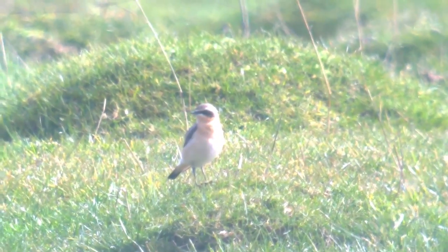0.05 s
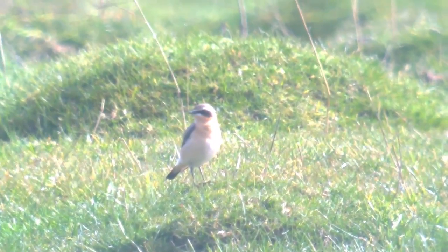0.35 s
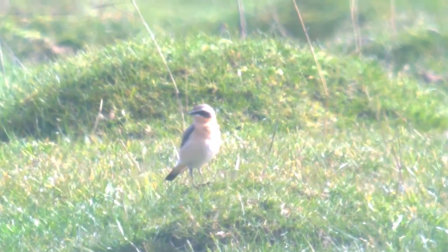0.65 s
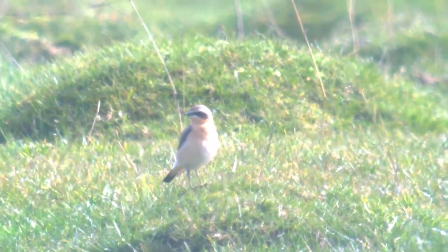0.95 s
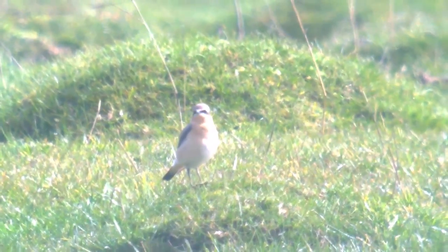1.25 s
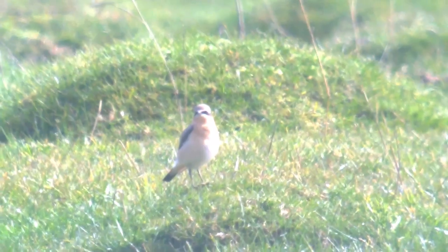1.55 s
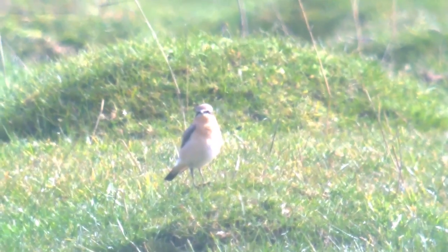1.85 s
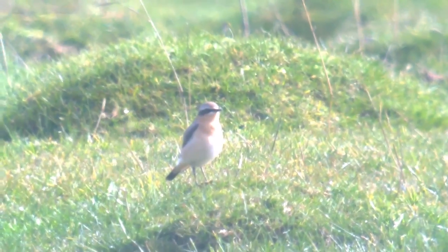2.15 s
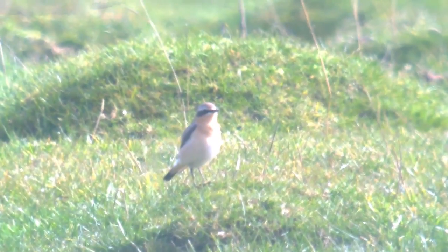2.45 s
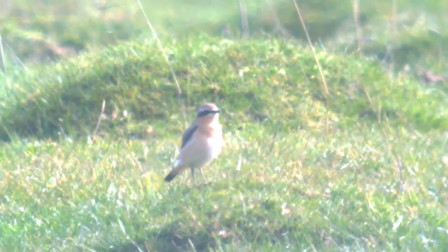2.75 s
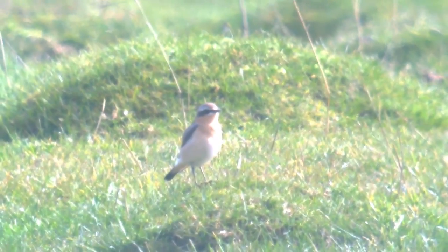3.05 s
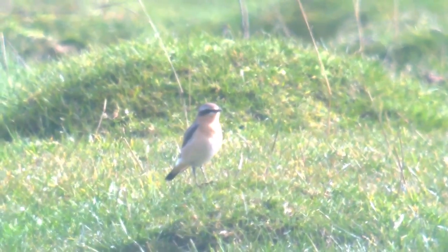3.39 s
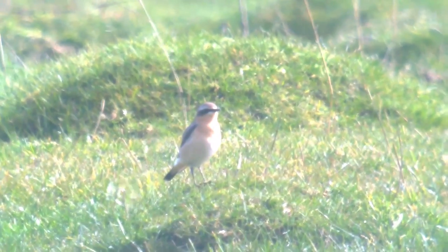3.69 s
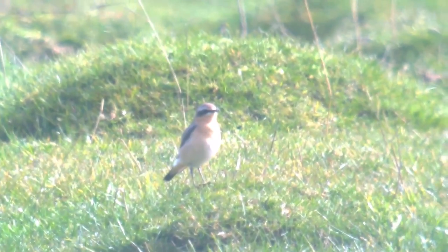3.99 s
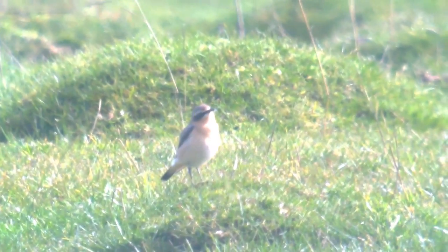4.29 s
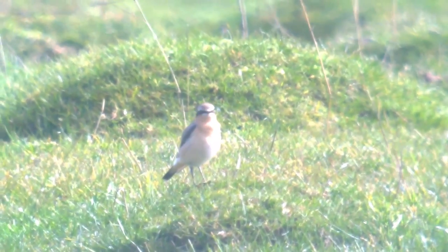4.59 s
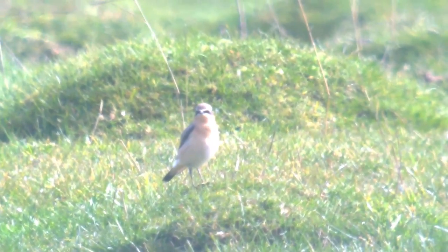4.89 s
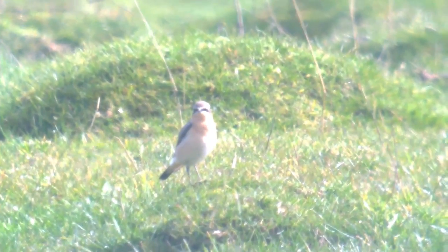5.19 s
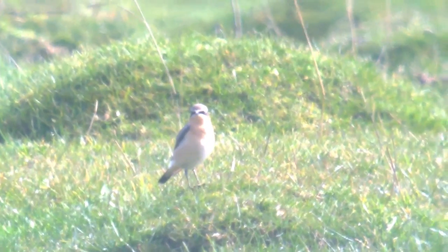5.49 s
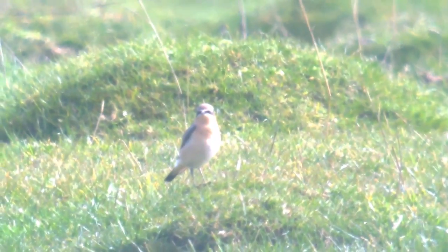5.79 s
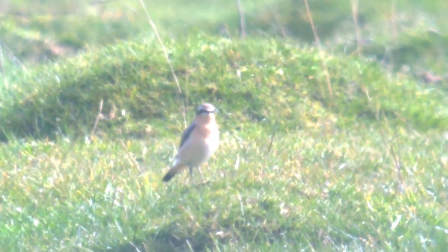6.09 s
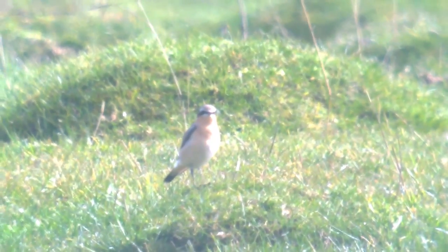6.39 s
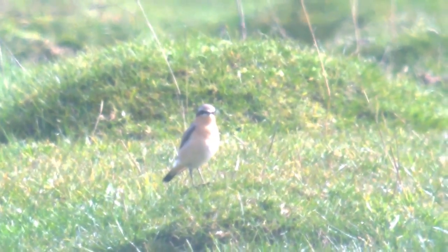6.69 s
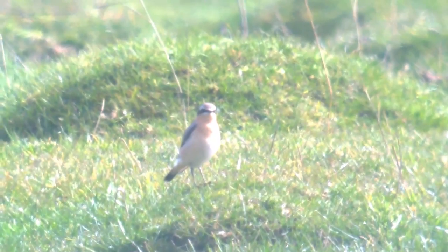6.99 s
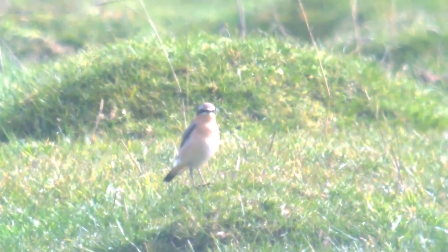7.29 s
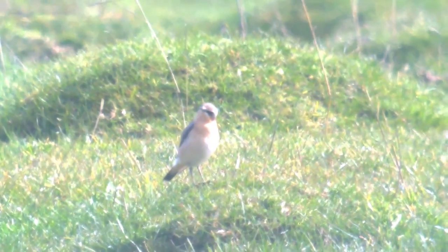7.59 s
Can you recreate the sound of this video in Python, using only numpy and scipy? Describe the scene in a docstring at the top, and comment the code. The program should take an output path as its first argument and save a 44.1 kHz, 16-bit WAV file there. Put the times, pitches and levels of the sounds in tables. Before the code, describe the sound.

Small birds chirp and trill faintly far across a field, under gusty wind, soft microphone bumps and distant echoing knocks.

```python
"""Breezy grassland with far birds

Gusts rumble and flutter on the port of one hand-held microphone, over the rush of the field and a
thin hiss. Small birds whistle, chirp, trill and buzz far off, their song wavering in the moving air.
The microphone takes low thumps and soft bumps; sharp, distant knocks echo. It all sits hard right."""
import sys
import numpy as np
from scipy import signal
from scipy.fft import rfft, irfft, next_fast_len
from scipy.io import wavfile
from scipy.ndimage import uniform_filter1d, map_coordinates

SR = 44100
rng = np.random.default_rng(int(sys.argv[2]) if len(sys.argv) > 2 else 0)


def materialize(psi):
    """Save the field psi as 16-bit PCM at rate SR to the path in sys.argv[1].

    A 1-D psi becomes a single channel; in a 2-D psi each row is a channel.
    """
    bounded = np.clip(np.atleast_2d(psi).T, -1, 1)
    quanta = np.round(bounded * 32767).astype(np.int16)
    wavfile.write(sys.argv[1], SR, quanta)


N = 337365
TIME = np.arange(N) / SR
MEAN_GUST_DB = -43

# Colours of the wind layers and the knocks' echo. Each row: frequency in Hz, relative level in dB.
HISS_COLOUR = [(900, 5.5), (1800, 0.5), (2400, 4), (2650, 2.5), (2880, 4), (3120, -2), (4200, -2.5),
               (5200, -1), (6200, -4.5), (7500, -9.5), (9700, -13), (10600, -7), (12300, -17.5)]
BREEZE_COLOUR = [(100, -1.5), (250, 4.5), (430, 0), (700, -4), (1050, -8.5), (1300, -18), (1700, -25),
                 (3000, -41.5)]
RUMBLE_COLOUR = [(12, -13.5), (24, -2), (38, 1.5), (55, -4), (75, -7.5), (100, -23.5), (150, -34.5),
                 (300, -62)]
FLUTTER_COLOUR = [(50, -22.5), (90, 5), (130, -2), (190, -10), (280, -19), (400, -24.5), (700, -51),
                  (1200, -74.5), (4000, -120)]
ECHO_COLOUR = [(200, -9.5), (400, 16), (560, 8), (800, -0.5), (1150, 3), (1500, -15), (1900, -22),
               (3000, -33.5), (5000, -58.5)]
# The slow lull and rise of the breeze. Each row: time in seconds, level offset in dB.
BREEZE_SWELL = [(0, -1.5), (.75, -1), (1.05, 0), (5.2, 1.5), (7.65, 0)]
# Wind strength on the port. Each row: time in seconds, level in dB.
GUST_CURVE = [(0.0, -43.5), (0.46, -49), (0.61, -33.5), (0.78, -39), (1.08, -37.5), (1.25, -42),
              (1.92, -39), (2.15, -45), (2.27, -47.5), (2.62, -43), (3.1, -47.5), (3.38, -48.5),
              (3.52, -40), (3.65, -46.5), (3.76, -40.5), (3.92, -45.5), (4.2, -39), (4.52, -48),
              (4.7, -38.5), (4.86, -41), (5.28, -38), (5.66, -45), (5.85, -37.5), (6.3, -44.5),
              (7.0, -44.5), (7.65, -47.5)]

# Long falling whistles. Each row: start and length in seconds, then level, swell and halfway dip in dB.
FALLING_WHISTLES = [(0.071, 0.21, -72.5, 2, 0), (1.679, 0.21, -71, -1.5, 8), (2.65, 0.22, -62.5, 10, -1),
                    (4.148, 0.196, -77.5, -10, 8)]
# The envelope they share. Each row: fraction of the length, level offset in dB.
WHISTLE_ENVELOPE = [(0, -11), (.4, -12.5), (.62, -4.5), (.8, -1), (.95, -5), (1, -7.5)]
# Thin high calls. Each row: start and length in seconds, first, top and last pitch in Hz,
# level and swell in dB.
THIN_CALLS = [(.398, .11, 5800, 7440, 6980, -82, -7), (2.982, .11, 6400, 6600, 5000, -90.5, 4),
              (3.128, .07, 6900, 7500, 6850, -90, 16), (3.77, .12, 8300, 8600, 8250, -99, 3),
              (4.88, 0.097, 7000, 7650, 6600, -97, 11), (5.94, .11, 6900, 7900, 7280, -88, 1),
              (6.192, .097, 7040, 7930, 7400, -96, -4), (6.46, .09, 7000, 8100, 7500, -98, 0)]
# Short held notes. Each row: start and length in seconds, pitch and glide in Hz, level in dB.
HELD_NOTES = [(.378, .023, 5740, 60, -74.5), (.756, 0.037, 4620, -300, -84),
              (0.989, 0.042, 4080, -60, -80.5), (1.065, .014, 3920, 2, -81),
              (3.807, 0.035, 4800, 700, -81.5), (4.19, 0.054, 6760, 100, -83),
              (4.305, .025, 5320, 160, -78), (4.676, 0.042, 4370, -60, -73),
              (5.299, 0.09, 4780, -420, -77.5), (5.462, .022, 3640, 150, -76),
              (5.656, 0.027, 3640, 0, -79.5), (5.808, 0.084, 4530, -100, -80.5),
              (6.052, .01, 4360, 400, -78), (6.072, .02, 3700, -70, -80), (6.59, .022, 4430, -350, -84),
              (6.885, .046, 4300, -150, -79), (7.205, .017, 5100, 280, -83),
              (7.568, 0.084, 4700, -450, -85)]
# Downward chirps. Each row: start and length in seconds, first and last pitch in Hz, level in dB.
DOWN_CHIRPS = [(.92, 0.044, 5500, 4800, -85), (.936, .0093, 4150, 3520, -77),
               (1.933, .026, 3500, 2450, -85), (2.017, .03, 3400, 2280, -85.5),
               (2.112, 0.041, 3440, 2190, -86), (2.913, 0.04, 3620, 2330, -80.5),
               (3.0, 0.0294, 3580, 2700, -84), (3.295, .02, 6050, 4750, -82), (3.37, .042, 4650, 4050, -87),
               (3.448, .02, 6100, 5100, -87), (4.482, .006, 5860, 2700, -70.5),
               (5.436, .022, 5400, 4150, -80), (5.86, .036, 6250, 5000, -84.5),
               (6.109, 0.057, 6400, 4750, -89), (6.377, .03, 6200, 5450, -86)]
# Rippling trills and dry rattles. Each row: start and length in seconds, level and swell in dB.
RIPPLE_TRILLS = [(.497, 0.37, -81.5, -9.5), (2.199, 0.29, -83.5, -9), (3.071, .2, -85.5, -3)]
RATTLE_TRILLS = [(1.2055, .39, -79.5, -10), (3.6035, .45, -80.5, -8)]
# Runs of single rising pips. Each row: start and length in seconds, first pitch, last pitch and
# pip sweep in Hz, pip length in seconds, level and swell in dB.
PIP_TRILLS = [(5.105, 0.13, 4330, 4360, 780, 0.0044, -75, 0), (6.962, 0.25, 3120, 2780, 250, .013, -84, -7),
              (7.373, .125, 4370, 4230, 700, 0.0045, -80, 2)]
# Soft warbles and one hard buzz. Each row: start and length in seconds, beats per second,
# pitch, glide and vibrato swing in Hz, level in dB.
SOFT_WARBLES = [(.228, .12, 60, 4600, 200, 130, -86), (2.555, .15, 79, 5100, -3, 80, -83),
                (2.895, 0.083, 85, 5040, -3, 60, -85), (3.298, .07, 66, 4400, -150, 80, -86),
                (3.918, 0.076, 58, 5220, 50, 130, -78.5), (4.54, 0.092, 62, 5130, -100, 190, -77.5),
                (4.895, .095, 52, 5180, 0, 140, -86), (5.255, .057, 54, 5340, 0, 160, -83),
                (5.72, 0.1, 60, 6300, 601, 100, -86), (5.948, 0.054, 80, 5450, 200, 250, -80.5),
                (6.382, .085, 52, 5160, 0, 160, -79), (6.66, 0.2, 49, 5150, -350, 220, -78.5),
                (6.995, .105, 57, 5060, 0, 140, -81)]
HARD_BUZZ = [(6.128, 0.45, 140, 4340, 0, 75, -68.5)]

# Distant knocks. Each row: start in seconds, crack level in dB, pitch ratio, echo level in dB.
FAR_KNOCKS = [(.992, -26.5, 1.06, -45), (1.529, -53.5, 1.12, -59.5), (2.704, -55, 1.2, -55.5),
              (4.175, -39.5, .83, -54.5), (5.144, -77, 1.25, -59), (5.753, -27, 1.014, -46.5),
              (6.566, -52.5, 0.81, -60.5)]
# A knock's hollow ring. Each row: frequency in Hz at pitch ratio 1, level in dB, seconds to fall 60 dB.
KNOCK_RING = [(445, -11.5, 0.09), (494.3, 8.5, 0.027), (751, -15.5, 0.056), (937, -19, 0.045),
              (1190, -17.5, 0.027), (1300, -20.5, 0.048)]
# Low thumps on the microphone, from handling or wind buffets, some with a click.
# Each row: start in seconds, thud in dB, thud pitch in Hz, click in dB.
LOW_THUMPS = [(0.012, -41, 166, -57), (0.209, -32.5, 60, -75), (.58, -44, 142, -43.5),
              (.589, -32.5, 142, -41.5), (0.684, -28, 167, -36), (.692, -26.5, 132, -26),
              (.865, -25.5, 108, -32), (1.896, -34.5, 130, -47.5), (2.126, -28, 59, -68),
              (3.745, -34.5, 85, -51), (4.165, -26.5, 50, -69), (5.83, -34.5, 95, -60)]
# Soft bumps on the housing. Each row: start in seconds, level in dB, pitch in Hz.
SOFT_BUMPS = [(1.136, -42, 293), (1.165, -46, 340), (1.35, -42, 290), (1.449, -53.5, 268),
              (2.569, -37.5, 286), (5.054, -52, 358), (5.17, -47, 337), (5.24, -49.5, 226),
              (6.362, -37, 277), (6.607, -52, 342)]


def from_db(db):
    """Decibels to gain."""
    return 10 ** (np.asarray(db) / 20)


def unit_rms(x):
    """Scale to an rms of 1."""
    return x / np.sqrt(np.mean(x ** 2) + 1e-20)


def automation(curve):
    """A breakpoint curve's value at every sample."""
    return np.interp(TIME, *np.transpose(curve))


def progress(length_s):
    """A ramp from 0 to 1 over a sound's length."""
    return np.linspace(0, 1, max(int(length_s * SR), 8))


def add(out, start, sound):
    """Mix a sound in at a start time in seconds."""
    at = max(round(start * SR), 0)
    out[at:at + len(sound)] += sound[:max(N - at, 0)]


def noise(colour):
    """Coloured noise at unit rms, rolled off outside its range."""
    size = next_fast_len(N)
    hz = np.maximum(np.fft.rfftfreq(size, 1 / SR), 1)
    points_hz, db = np.transpose(colour)
    skirts = 1 / np.hypot(1, (points_hz[0] / hz / 2) ** 2) / np.hypot(1, (hz / points_hz[-1] / 2) ** 2)
    gain = from_db(np.interp(np.log(hz), np.log(points_hz), db)) * skirts
    return unit_rms(irfft(rfft(rng.standard_normal(size)) * gain, size)[:N])


def drift(rate_hz):
    """A smooth random modulator at unit rms, mostly slower than the given rate."""
    size = next_fast_len(N)
    hz = np.fft.rfftfreq(size, 1 / SR)
    return unit_rms(irfft(rfft(rng.standard_normal(size)) / (1 + (hz / rate_hz) ** 2), size)[:N])


def levelled(x, span_s):
    """Ride a noise to about unit level, leaving its quick lumps in."""
    return x / np.sqrt(uniform_filter1d(x ** 2, max(int(span_s * SR), 2)) + 1e-6)


def field_breeze(rush_db=-68.5, gust_follow=0.14, hiss_db=-83.5):
    """The bed: air rushing over the field, leaning a little with the gusts, and a steady thin hiss."""
    gust_lift_db = gust_follow * (automation(GUST_CURVE) - MEAN_GUST_DB)
    rush = from_db(rush_db + gust_lift_db + automation(BREEZE_SWELL)) * noise(BREEZE_COLOUR)
    return rush + from_db(hiss_db) * noise(HISS_COLOUR)


def whistle(hz, db, edge_s=0.0015):
    """A bird's voice: a pure tone riding a pitch and level curve, with soft ends."""
    fades = signal.windows.tukey(len(hz), min(2 * edge_s * SR / len(hz), 1))
    return np.sin(2 * np.pi * np.cumsum(hz) / SR) * from_db(db) * fades


def far_chatter(db=-94, centre_hz=5150, spread_hz=560, glide_hz=400, swing_hz=170, beats_per_s=55):
    """The farthest birds blur into a faint random twitter."""
    out, count = np.zeros(N), 150
    timings, voices = rng.random((count, 2)), rng.standard_normal((count, 3))
    for (when, size), (pitch, glide, accent_db) in zip(timings, voices):
        u = progress(0.013 + 0.081 * size)
        vibrato = swing_hz * np.sin(2 * np.pi * beats_per_s * TIME[:len(u)])
        hz = centre_hz + spread_hz * pitch + glide_hz * glide * (u - .5) + vibrato
        add(out, when * N / SR, whistle(hz, db + accent_db))
    return out


def thin_calls(leap_s=0.022, sag_power=1.8):
    """High calls that leap up, then sag ever faster."""
    out = np.zeros(N)
    for start, length_s, first_hz, top_hz, last_hz, db, swell_db in THIN_CALLS:
        u = progress(length_s)
        leap_hz = np.interp(u * length_s, [0, leap_s], [first_hz, top_hz])
        sag = np.maximum((u * length_s - leap_s) / (length_s - leap_s), 0) ** sag_power
        add(out, start, whistle(leap_hz + (last_hz - top_hz) * sag, db + swell_db * (u - .5)))
    return out


def held_notes(arch_hz=70, swell_db=4, flick_hz=170, flick_s=.005):
    """Short notes that arch in pitch and flick down as the bird lets go."""
    out = np.zeros(N)
    for start, length_s, hz, glide_hz, db in HELD_NOTES:
        u = progress(length_s)
        droop_hz = arch_hz * (2 * u - 1) ** 2 + flick_hz * np.exp((u - 1) * length_s / flick_s)
        add(out, start, whistle(hz + glide_hz * (u - .5) - droop_hz, db + swell_db * (u - .5)))
    return out


def chirps(bend=0.76):
    """Quick downward sweeps, steepest at the attack."""
    out = np.zeros(N)
    for start, length_s, first_hz, last_hz, db in DOWN_CHIRPS:
        hz = first_hz * (last_hz / first_hz) ** (progress(length_s) ** bend)
        add(out, start, whistle(hz, db))
    return out


def falling_whistles(first_hz=5200, rest_hz=3250, sink=1.72, dip_width=0.2):
    """Long whistles that sink towards a resting pitch and bloom late; some duck halfway."""
    out = np.zeros(N)
    for start, length_s, db, swell_db, dip_db in FALLING_WHISTLES:
        u = progress(length_s)
        hz = rest_hz + (first_hz - rest_hz) * np.exp(-sink * u)
        dip = np.exp(-((u - .5) / dip_width) ** 2)
        envelope_db = np.interp(u, *np.transpose(WHISTLE_ENVELOPE)) - dip_db * dip
        add(out, start, whistle(hz, db + swell_db * (u - 1) + envelope_db))
    return out


def pips(starts, pitches_hz, levels_db, sweep_hz, pip_s, jitter_db=1.3, jitter_s=0.00019, jitter_hz=40):
    """A string of tiny sweeps, none quite like the last."""
    out = np.zeros(N)
    sweep = sweep_hz * (progress(pip_s) - .5)
    for start, hz, db in zip(starts, pitches_hz, levels_db):
        soft, late, sharp = rng.standard_normal(3)
        add(out, start + jitter_s * late, whistle(hz + jitter_hz * sharp + sweep, db - jitter_db * soft))
    return out


def paired_trills(rows, pairs_per_s, first_hz, rest_hz, settle_s, sweep_hz, pip_s,
                  twin_s, twin_hz, onset_db, onset_lag_s=0, twin_db=-0.5):
    """Each pip has a twin close behind; the trill eases onto its resting pitch and fades."""
    out = np.zeros(N)
    for start, length_s, db, swell_db in rows:
        t = np.arange(0, length_s, 1 / pairs_per_s)
        unsettled = np.exp(-t / settle_s)
        starts = start + t + onset_lag_s * unsettled ** 2
        hz = rest_hz + (first_hz - rest_hz) * unsettled
        level_db = db + swell_db * (t / length_s - .5) + onset_db * unsettled ** 2
        out += pips(starts, hz, level_db, sweep_hz, pip_s)
        out += pips(starts + twin_s, hz + twin_hz, level_db + twin_db, sweep_hz, pip_s)
    return out


def trills(single_pips_per_s=43.3):
    """Ripples of up-sweeps that settle lower, dry rattles of down-sweeps that climb, and plain runs."""
    out = paired_trills(RIPPLE_TRILLS, pairs_per_s=30, first_hz=4220, rest_hz=3670, settle_s=0.027,
                        sweep_hz=430, pip_s=0.009, twin_s=.012, twin_hz=-220, onset_db=-1)
    out += paired_trills(RATTLE_TRILLS, pairs_per_s=34.6, first_hz=3470, rest_hz=4260, settle_s=0.073,
                         sweep_hz=-1700, pip_s=0.00634, twin_s=.009, twin_hz=-34, onset_db=-5,
                         onset_lag_s=.009)
    for start, length_s, first_hz, last_hz, sweep_hz, pip_s, db, swell_db in PIP_TRILLS:
        t = np.arange(0, length_s, 1 / single_pips_per_s)
        u = t / length_s
        hz = first_hz + (last_hz - first_hz) * u
        out += pips(start + t, hz, db + swell_db * (u - .5), sweep_hz, pip_s)
    return out


def buzzes(rows, throb, fade_db, rate_wander=0.02, rough_hz=70, sharpness=1.9):
    """Fast vibrato and tremolo locked together: a shallow throb warbles, a deep one buzzes."""
    out, wander, tremble = np.zeros(N), drift(9.2), drift(130)
    for start, length_s, beats_per_s, hz, glide_hz, swing_hz, db in rows:
        u = progress(length_s)
        span = int(start * SR) + np.arange(len(u))
        beat = 2 * np.pi * np.cumsum(beats_per_s * (1 + rate_wander * wander[span])) / SR
        tremolo = (1 - throb * (1 - np.cos(beat)) / 2) ** sharpness
        pitch_hz = hz + glide_hz * (u - .5) + swing_hz * np.sin(beat) + rough_hz * tremble[span]
        add(out, start, tremolo * whistle(pitch_hz, db - fade_db * (2 * u - 1) ** 2))
    return out


def across_field(song, waver_db=1.3, waver_hz=45, jitter_s=.000018, scatter_db=-17, scatter_t60=0.075):
    """Moving air wobbles the song's level and arrival time; grass and banks scatter a faint tail."""
    t = TIME[:SR // 2]
    tail = rng.standard_normal(len(t)) * from_db(-60 * t / scatter_t60)
    scattered = signal.fftconvolve(song, tail / np.linalg.norm(tail))[:N]
    direct = map_coordinates(song, [(TIME + jitter_s * drift(waver_hz)) * SR], order=3)
    return direct * from_db(waver_db * drift(waver_hz)) + from_db(scatter_db) * scattered


def far_knocks(attack_s=0.0038, bounce_cycles=2.725, bounce_db=-3, dull_hz=1900,
               echo_attack_s=0.0032, early_t60=0.17, late_t60=0.82, late_db=-13):
    """A short hollow crack dulled by distance, one close reflection, then a wash of echo off the land."""
    cracks, echo_envelope, t = np.zeros(N), np.zeros(N), TIME[:SR]
    strongest_mode_hz = KNOCK_RING[1][0]
    echo_decay = from_db(-60 * t / early_t60) + from_db(late_db - 60 * t / late_t60)
    for start, db, pitch, echo_db in FAR_KNOCKS:
        ring = sum(from_db(mode_db - 60 * t / t60) * np.sin(2 * np.pi * hz * pitch * t)
                   for hz, mode_db, t60 in KNOCK_RING)
        crack = from_db(db) * ring * (1 - np.exp(-t / attack_s))
        add(cracks, start, crack)
        add(cracks, start + bounce_cycles / (strongest_mode_hz * pitch), from_db(bounce_db) * crack)
        add(echo_envelope, start, from_db(echo_db) * echo_decay * (1 - np.exp(-t / echo_attack_s)))
    cracks = signal.sosfilt(signal.butter(2, dull_hz, fs=SR, output="sos"), cracks)
    return cracks + echo_envelope * noise(ECHO_COLOUR)


def jolt(db, hz, peak_s, sag=.18, sag_s=0.027):
    """One jolt to the microphone swells into a brief tone whose pitch sags."""
    t = TIME[:SR // 5]
    pitch_hz = hz * (1 - sag * (1 - np.exp(-t / sag_s)))
    envelope = t / peak_s * np.exp(1 - t / peak_s)
    return -from_db(db) * envelope * np.sin(2 * np.pi * np.cumsum(pitch_hz) / SR)


def thumps_and_bumps(click_lag_s=0.0012, rebound_s=0.0219, rebound_pitch=0.587, rebound_db=-4,
                     dull_hz=620):
    """Low handling or wind thumps, some with a click, and soft bumps that rock back; padding dulls all."""
    out = np.zeros(N)
    for start, thud_db, hz, click_db in LOW_THUMPS:
        add(out, start, jolt(thud_db, hz, peak_s=0.0042))
        add(out, start + click_lag_s, jolt(click_db, hz=278, peak_s=0.00084))
    for start, db, hz in SOFT_BUMPS:
        add(out, start, jolt(db, hz, peak_s=.0055))
        add(out, start + rebound_s, jolt(db + rebound_db, hz * rebound_pitch, peak_s=.0055))
    return signal.sosfilt(signal.butter(3, dull_hz, fs=SR, output="sos"), out)


def wind_on_port(rumble_trim_db=-0.07, eddy_db=2.5, eddy_hz=9,
                 flutter_db=-57.5, gust_follow=1.77, lump_db=3.5, lump_hz=25):
    """Big eddies rumble on the microphone port; small ones flutter, swelling more steeply in a gust."""
    gust_db = automation(GUST_CURVE)
    buffet_db = eddy_db * drift(eddy_hz)
    rumble = from_db(gust_db + buffet_db + rumble_trim_db) * levelled(noise(RUMBLE_COLOUR), span_s=0.08)
    flutter = levelled(noise(FLUTTER_COLOUR) * from_db(lump_db * drift(lump_hz)), span_s=0.14)
    flutter_gain = from_db(flutter_db + gust_follow * (gust_db - MEAN_GUST_DB) + buffet_db)
    return rumble + flutter_gain * flutter


def scene(master_gain=2):
    """The whole field on one microphone, wired to the right channel alone."""
    song = thin_calls() + held_notes() + chirps() + falling_whistles() + trills()
    song += buzzes(SOFT_WARBLES, throb=0.31, fade_db=6.5)
    song += buzzes(HARD_BUZZ, throb=0.92, fade_db=15.5)
    wind = wind_on_port() + field_breeze()
    birds = across_field(song + far_chatter())
    mix = wind + birds + far_knocks() + thumps_and_bumps()
    return np.array([np.zeros(N), master_gain * mix])


def record(dry, self_noise_db=-93.0, cutoff_hz=12300):
    """Both inputs add a trace of their own hiss; a steep low-pass shaves off the top."""
    wet = dry + from_db(self_noise_db) * rng.standard_normal((2, N))
    return signal.sosfilt(signal.ellip(10, .1, 70, cutoff_hz, fs=SR, output="sos"), wet)


dry = scene()
out = record(dry)
materialize(out)
```